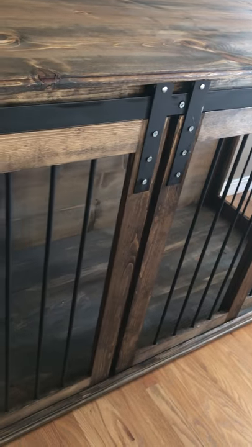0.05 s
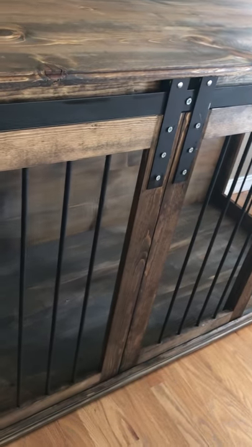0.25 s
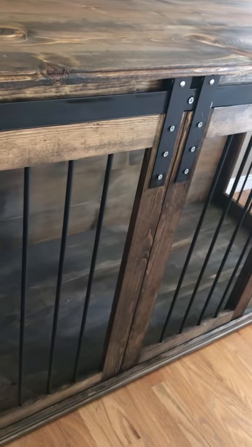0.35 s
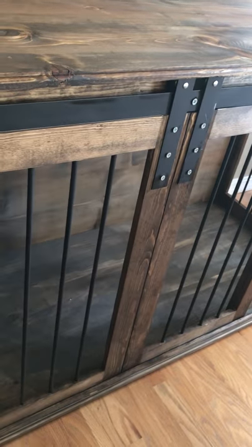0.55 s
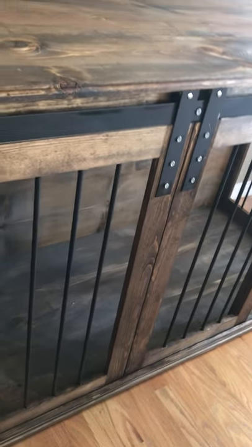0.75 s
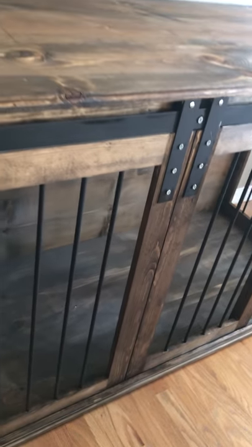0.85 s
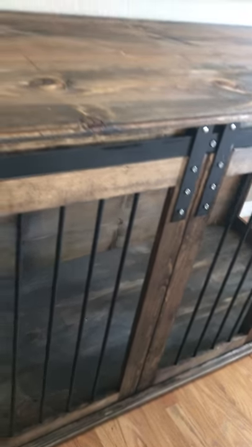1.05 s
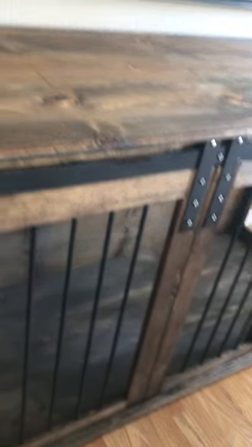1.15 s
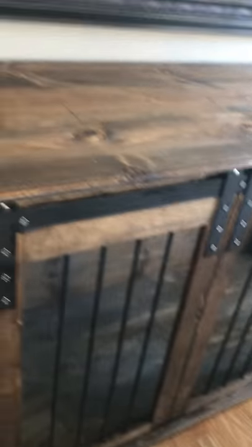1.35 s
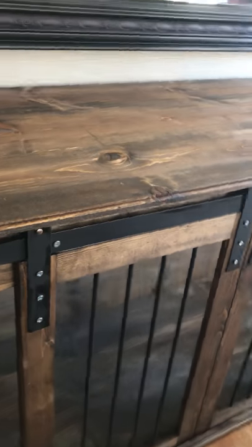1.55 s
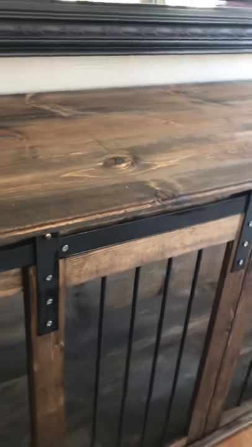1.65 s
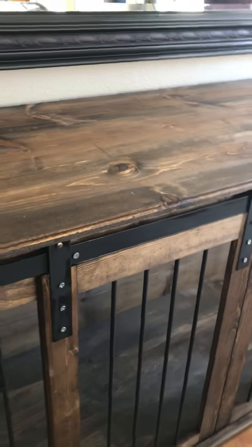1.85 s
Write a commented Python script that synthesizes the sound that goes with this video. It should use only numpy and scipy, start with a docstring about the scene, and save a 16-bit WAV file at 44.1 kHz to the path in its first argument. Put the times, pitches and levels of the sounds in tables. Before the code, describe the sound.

A small wooden sliding door rolls along a steel rail, its rumble swelling quickly. From about 0.3 to 0.4 seconds it bumps the next door with three sharp clacks, a hollow boom and slight metallic ringing. Another clack comes near 0.6 seconds. Lighter knocks follow around 0.8, 0.9 and 1.1 seconds, then two faint taps by 1.5, as the door hums softly and settles over low room rumble.

```python
"""A furnished room: a small wooden barn door on a cabinet rolls along its steel rail and bumps the next door.
The wheels rumble over tiny bumps, louder as they gather speed, and set the rail ringing.
On impact the steel hangers clack and the panels boom; the door hums and rocks on with lighter knocks.
The room answers the wheels and hangers with a short tail, over a low rumble."""
import sys
import numpy as np
from scipy import signal
from scipy.fft import rfft, irfft, next_fast_len
from scipy.io import wavfile

SR = 44100
rng = np.random.default_rng(int(sys.argv[2]) if len(sys.argv) > 2 else 0)


def wav_out(sig):
    """Save sig, one row per channel (or a flat mono array), as 16-bit PCM at SR to the path in sys.argv[1]."""
    wavfile.write(sys.argv[1], SR, np.round(np.clip(np.atleast_2d(sig).T, -1, 1) * 32767).astype(np.int16))


N = 83790
CONTACT_ATTACK_S, CONTACT_HOLD_S = 0.00035, 0.0043
# modes of the steel hangers and rail (frequency [Hz], relative level [dB], t60 [s])
STEEL_MODES = [(919, 0, .45), (1045, 0, .42), (1231, 2, .42), (1523, -1, .42), (1733, 1, .4),
               (1981, 1, .44), (2173, -1, .35), (2318, -1, .35), (2650, -2, .4), (2945, -4, .38),
               (3237, -2, .35), (3279, -1, .4), (4239, -8, .35), (5200, -8, .35), (12610, -14, .15)]


def amp(db):
    """Decibels to gain."""
    return 10 ** (np.asarray(db) / 20)


def unit(x):
    """Scale to rms 1."""
    return x / np.sqrt(np.mean(x ** 2) + 1e-20)


def along(points, hz):
    """Read a (frequency [Hz], value) curve on a log frequency axis."""
    freqs, values = np.transpose(points)
    return np.interp(np.log(hz + 1), np.log(freqs + 1), values)


def filtered(x, gain):
    """Equalise x with the curve gain(hz)."""
    size = next_fast_len(N + 8192)
    return irfft(rfft(x, size) * gain(np.fft.rfftfreq(size, 1 / SR)), size)[:N]


def noise(gain):
    """Coloured noise of rms 1."""
    return unit(filtered(rng.standard_normal(N), gain))


def since(start):
    """Seconds after start, zero before it."""
    return np.maximum(np.arange(N) / SR - start, 0)


def burst(t, t60):
    """Envelope of a contact: a short hold while it chatters, then a fast decay."""
    return amp(-60 * np.maximum(t - CONTACT_HOLD_S, 0) / t60)


def ring(modes, t, scatter_db):
    """Decaying modes, each struck a little harder or softer every time."""
    return sum(amp(db + scatter_db * rng.standard_normal() - 60 * t / t60) * np.sin(2 * np.pi * hz * t)
               for hz, db, t60 in modes)


def room_tone():
    """The bed: a steady low rumble with a faint hiss on top."""
    # colour of the bed (frequency [Hz], relative level [dB])
    colour = [(20, -8), (45, -3), (80, -.5), (230, -4), (500, -13.5), (1250, -19), (2500, -25),
              (5200, -28.5), (10300, -32), (17500, -33)]
    return amp(-64.5) * noise(lambda hz: amp(along(colour, hz)))


def in_room(x, onset_s=0.0015):
    """Add the room's diffuse tail, strongest in the bass and shortest near 10 kHz."""
    # reverb time (frequency [Hz], t60 [s])
    decay = [(100, 0.46), (1000, 0.63), (3000, 0.63), (6000, 0.48), (10000, 0.16), (16000, 0.5)]
    # reverb send (frequency [Hz], level [dB])
    send = [(100, 9.5), (1000, 0), (3000, -6.5), (6000, -7.5), (10000, -4), (16000, -28)]
    hz, t, spectrum = signal.stft(rng.standard_normal(SR), SR, nperseg=256)
    t60 = along(decay, hz)[:, None]
    envelope = amp(along(send, hz)[:, None] - 60 * t / t60)
    energy_trim = np.sqrt(2 * np.log(1000) / (t60 * SR))  # a longer decay adds no energy
    tail = signal.istft(spectrum * envelope * energy_trim, SR, nperseg=256)[1]
    tail *= 1 - np.exp(-np.arange(len(tail)) / SR / onset_s)
    return x + signal.fftconvolve(x, tail)[:N]


def door_hum(pitch_hz=224.3):
    """One lightly damped mode of the door sings on while it rocks."""
    # envelope of the hum (time [s], level [dB])
    envelope = [(0, -56.5), (.15, -65.5), (.55, -53.5), (.76, -55.5), (1.02, -54), (1.05, -64.5),
                (1.19, -61), (1.26, -77), (1.36, -66.5), (1.6, -75)]
    t = since(0)
    return amp(np.interp(t, *np.transpose(envelope))) * unit(np.sin(2 * np.pi * pitch_hz * t))


def rolling_wheels(bumps_per_s=900):
    """The wheels run over many tiny bumps, louder as the door speeds up, and set the rail ringing."""
    # swell and fade of the roll (time [s], level [dB])
    swell = [(0, -75), (.06, -61), (.15, -50.5), (.24, -43), (0.289, -41), (0.351, -44), (0.419, -48),
             (0.548, -90), (.7, -110)]
    # colour of wheels on the rail (frequency [Hz], relative level [dB])
    colour = [(24, -22), (40, -15), (70, -6), (107, -16), (218, 1.5), (281, -6.5), (319, -12), (362, -7.5),
              (466, -14.5), (901, -14), (1220, -13), (2890, -11.5), (17000, -40)]
    t = since(0)
    level = amp(np.interp(t, *np.transpose(swell)))
    bumps = unit((rng.random(N) < bumps_per_s / SR) * rng.standard_normal(N))
    grit = bumps + amp(3) * rng.standard_normal(N)  # steady noise smooths the crackle
    wheels = level * unit(filtered(grit, lambda hz: amp(along(colour, hz))))
    steel = ring(STEEL_MODES, t, scatter_db=2.5)
    rail = signal.fftconvolve(level * grit, steel / np.linalg.norm(steel))[:N]
    return in_room(wheels + amp(-12.5) * rail)


def hanger_knocks():
    """A hanger taps and rattles as the door settles; the last taps are softer, duller and more pitched."""
    # taps (time [s], level [dB], low-pass [Hz], relative rattle [dB], relative ring [dB])
    taps = [(0.7724, -45.5, 2490, -22, -19), (0.9293, -40.5, 6850, -20, -24),
            (1.0962, -45.5, 4800, -12, -18), (1.272, -58.5, 1500, -24, -11), (1.495, -58.5, 1500, -26, -11)]
    # colour of the hanger's body (frequency [Hz], relative level [dB])
    colour = [(200, -18.5), (650, -7.5), (900, -5), (1100, -1.5), (1300, 5.5), (1600, -2.5), (2200, -0.5),
              (3500, -2.5), (5800, -3.5), (6600, -12), (16000, -8)]
    # the hanger's short modes (frequency [Hz], relative level [dB], t60 [s])
    modes = [(1092, -3, .22), (1240, 0, .14), (1295, 4, .16), (1793, -6, .2), (2160, -3, .1),
             (2370, -2, .1), (3100, -3, .11), (3625, -7, .13)]
    out = np.zeros(N)
    for start, db, high_hz, rattle_db, ring_db in taps:
        t = since(start)
        envelope = burst(t, t60=0.042) + amp(rattle_db) * burst(t, t60=0.25)
        body = noise(lambda hz: amp(along(colour, hz))) * envelope
        ping = amp(ring_db) * ring(modes, t, scatter_db=0.5)
        tap = (body + ping) * (1 - np.exp(-t / CONTACT_ATTACK_S))
        out += in_room(amp(db) * filtered(tap, lambda hz: 1 / np.sqrt(1 + (hz / high_hz) ** 5)))
    return out


def panel_thuds(thump_t60_s=0.67, falloff_db_per_octave=5):
    """Door and cabinet boom over a dull thump; the spot that is struck picks the strongest modes."""
    # blows on the wood; the first is already ringing as the scene opens
    # (time [s], door [dB], cabinet [dB], thump [dB], attack [s], most excited pitch [Hz])
    blows = [(-.1, -49.5, -46, -46, .01, 151), (.176, -72, -49.5, -66, 0.016, 240),
             (.296, -46.5, -25, -37.5, 0.014, 198), (.349, -52, -30.5, -33, .004, 300),
             (.397, -49, -35, -42, 0.0032, 276), (.572, -45, -56, -40.5, 0.0047, 383),
             (.606, -39, -71, -42.5, 0.01, 128), (.775, -52.5, -59, -51.5, 0.015, 110),
             (.93, -59.5, -63.5, -55, 0.0069, 280), (1.097, -58.5, -59, -61.5, 0.0056, 80)]
    # colour of the cabinet's thump (frequency [Hz], relative level [dB])
    colour = [(20, -5), (45, -11.5), (75, -2.5), (125, -4), (200, -1.5), (300, -10.5), (450, -22),
              (800, -16), (2000, -81)]
    # modes of the door and of the cabinet (frequency [Hz], relative level [dB], t60 [s])
    door_modes = [(123.2, -0.5, 0.44), (164.3, -6.5, 1.1), (182, -4, 0.79), (240.7, -7, 0.91),
                  (275, -5.5, 1.1), (344.5, -6.5, 0.65), (377, -3.5, 0.41)]
    cabinet_modes = [(75.04, 0.5, 0.63), (92.3, -8.5, 0.3), (199, -8, .4), (212.3, 1.5, 0.65),
                     (283.9, 0.5, 0.293)]

    def struck(modes, pitch_hz):
        """Modes speak less the farther they lie from the most excited pitch."""
        return [(hz, db - falloff_db_per_octave * abs(np.log2(hz / pitch_hz)), t60)
                for hz, db, t60 in modes]

    out = np.zeros(N)
    for start, door_db, cabinet_db, thump_db, attack_s, pitch_hz in blows:
        t = since(start)
        thump = amp(thump_db - 60 * t / thump_t60_s) * noise(lambda hz: amp(along(colour, hz)))
        door = amp(door_db) * ring(struck(door_modes, pitch_hz), t, scatter_db=1.5)
        cabinet = amp(cabinet_db) * ring(struck(cabinet_modes, pitch_hz), t, scatter_db=1)
        out += (door + cabinet + thump) * (1 - np.exp(-t / attack_s))
    return out


def impact_clacks():
    """Each hard contact is a brief, dense crack of wood that sets the steel ringing."""
    # hard contacts (time [s], level [dB], high-pass [Hz], low-pass [Hz], crack t60 [s])
    contacts = [(0.29, -33.5, 1680, 15100, 0.036), (0.3472, -26, 670, 9100, 0.069),
                (.356, -31.5, 800, 14000, 0.015), (0.395, -31, 735, 7900, 0.072),
                (0.569, -42.5, 390, 3576, 0.15), (0.5772, -31.5, 1840, 7600, 0.035),
                (0.594, -38.5, 280, 2150, 0.058)]
    # colour of the crack (frequency [Hz], relative level [dB])
    colour = [(100, 0), (600, 1), (1200, 1), (2000, 0.5), (3000, 0.5), (4200, -4.5), (5500, -6.5),
              (8000, -12), (11000, -15), (17000, -13)]
    out = np.zeros(N)
    for start, db, low_hz, high_hz, t60 in contacts:
        t = since(start)
        high_pass = lambda hz: (hz / low_hz) ** 2 / np.sqrt(1 + (hz / low_hz) ** 4)
        band = lambda hz: high_pass(hz) / np.sqrt(1 + (hz / high_hz) ** 6)
        crack = noise(lambda hz: band(hz) * amp(along(colour, hz))) * burst(t, t60)
        steel = amp(-25.5) * filtered(ring(STEEL_MODES, t, scatter_db=1), band)
        out += in_room(amp(db) * (crack + steel) * (1 - np.exp(-t / CONTACT_ATTACK_S)))
    return out


def scene():
    """The door rolls, bumps and settles over the room tone, in mono."""
    return (room_tone() + rolling_wheels() + impact_clacks() + hanger_knocks()
            + panel_thuds() + door_hum())[None]


def record(dry):
    """The microphone loses the deepest bass and keeps nothing above its band limit."""
    low_cut_hz, top_hz = 31, 17900
    return filtered(dry[0], lambda hz: (hz < top_hz) * (1 - 1 / (1 + (hz / low_cut_hz) ** 8)))[None]


dry = scene()
out = record(dry)
wav_out(out)
```